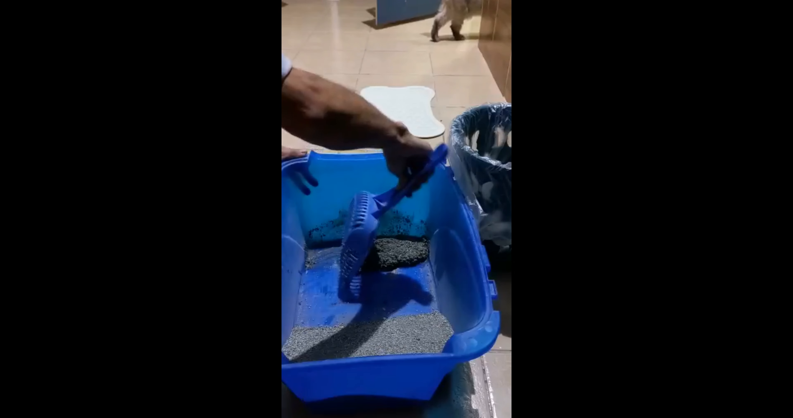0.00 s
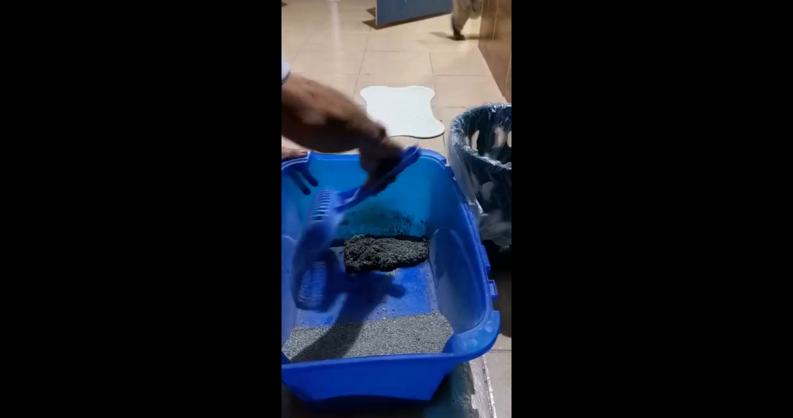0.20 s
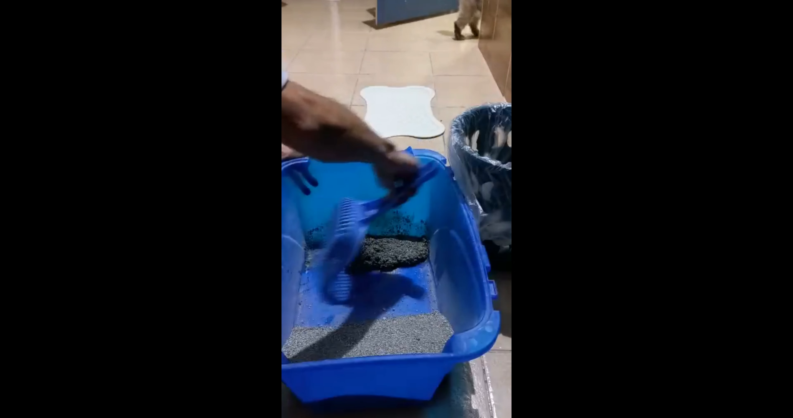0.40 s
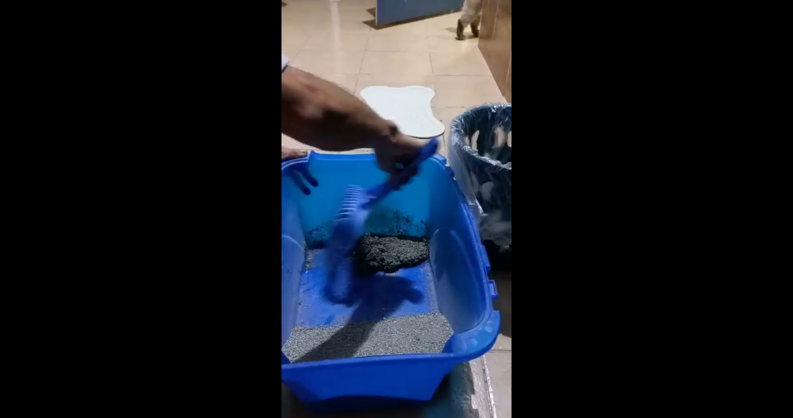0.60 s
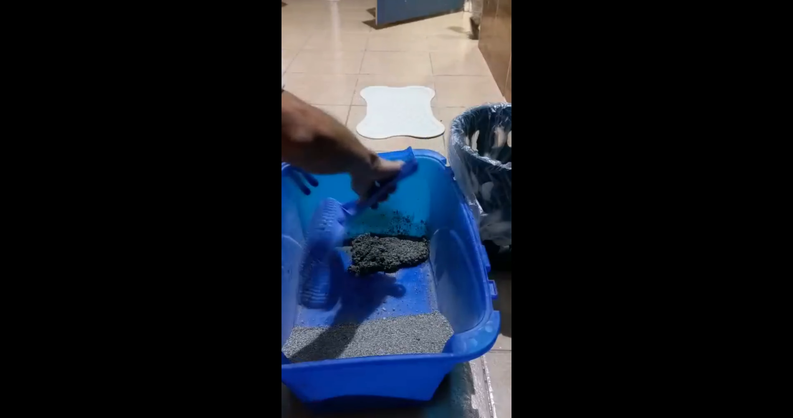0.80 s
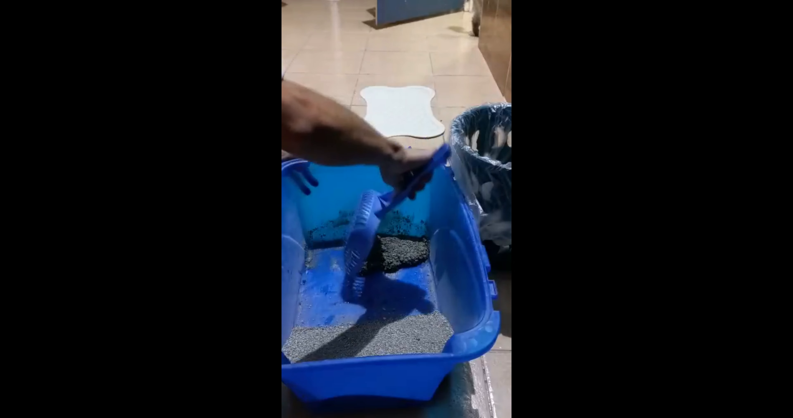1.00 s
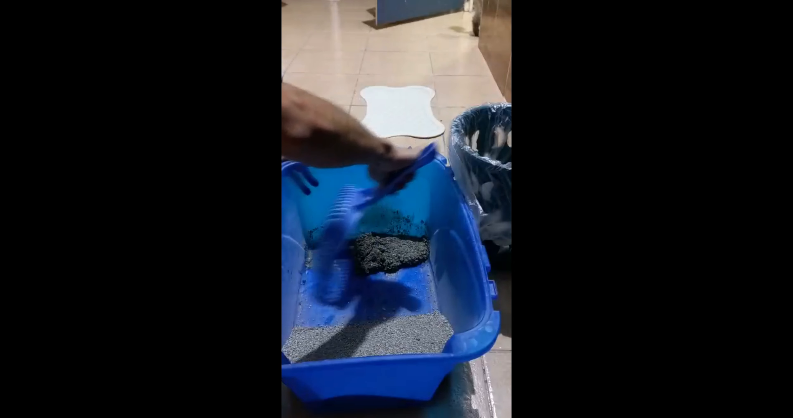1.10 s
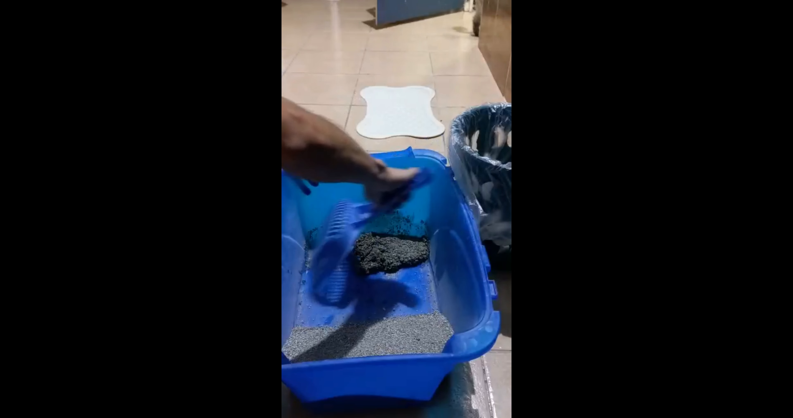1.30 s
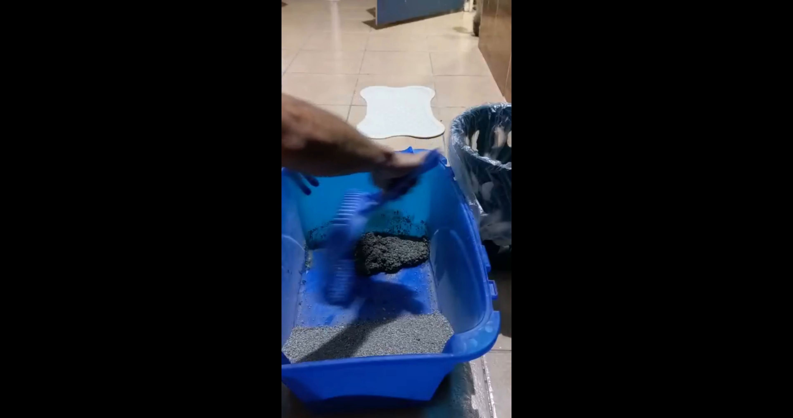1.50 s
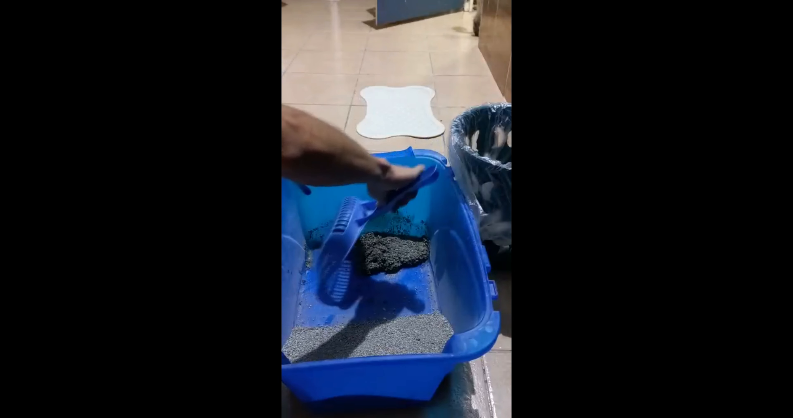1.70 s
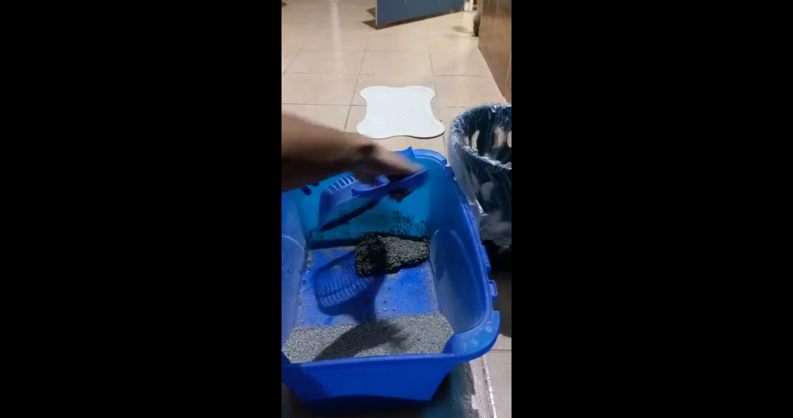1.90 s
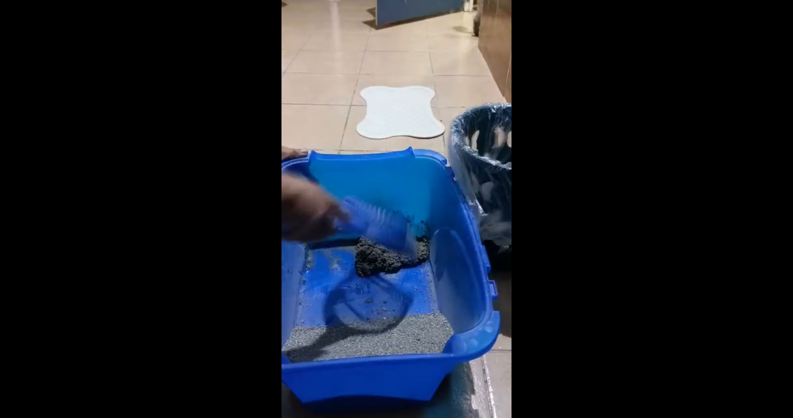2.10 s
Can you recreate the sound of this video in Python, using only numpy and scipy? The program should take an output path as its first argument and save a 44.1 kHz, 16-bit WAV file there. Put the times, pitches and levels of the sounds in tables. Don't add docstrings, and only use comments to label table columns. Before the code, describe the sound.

Quick gritty scrapes of a plastic scoop shaken in a litter box, with hollow plastic bumps

```python
import sys
import numpy as np
from scipy import signal
from scipy.fft import rfft, irfft
from scipy.io import wavfile

SR = 44100
rng = np.random.default_rng(int(sys.argv[2]) if len(sys.argv) > 2 else 0)


def voltage_ratio(decibels):
    exponent = np.asarray(decibels, float) / 20
    return 10 ** exponent


def materialize(psi):
    bounded = np.clip(np.atleast_2d(psi).T, -1, 1)
    quanta = np.round(bounded * 32767).astype(np.int16)
    wavfile.write(sys.argv[1], SR, quanta)


N = 97020
BODY_PAN_DB = 2.5


def rms_one(x):
    return x / np.sqrt(np.mean(x ** 2) + 1e-20)


def filtered(x, order, hz, kind="low"):
    return signal.sosfilt(signal.butter(order, hz, kind, fs=SR, output="sos"), x)


def coloured(x, spectrum):
    hz, db = np.transpose(spectrum)
    grid = np.fft.rfftfreq(x.shape[-1], 1 / SR) + 1
    octaves_outside = np.log2(np.clip(hz[0] / grid, 1, None) * np.clip(grid / hz[-1], 1, None))
    gain = voltage_ratio(np.interp(np.log(grid), np.log(hz), db) - 4.3 * octaves_outside)
    return rms_one(irfft(rfft(x) * gain, x.shape[-1]))


def pan(db):
    return voltage_ratio(np.array([[db / 2], [-db / 2]]))


def wander(db, step_s):
    marks = np.arange(0, N / SR + 0.5, step_s)
    return voltage_ratio(db * np.interp(np.arange(N) / SR, marks, rng.standard_normal(len(marks))))


def strokes(rows, fall_db_per_s):
    t, power = np.arange(N) / SR, np.zeros(N)
    for start, rise, hold, db in rows:
        up = np.clip((t - start) / max(rise, 0.0002), 0, 1) ** 0.82
        released_s = np.clip(t - start - rise - hold, 0, None)
        power += (up * voltage_ratio(db - fall_db_per_s * released_s)) ** 2
    return np.sqrt(power)


def contacts(rate, uneven_db, clump_db, apart):
    clump = wander(clump_db, 0.0053)
    struck = rng.random((3, N)) < rate / SR
    size = voltage_ratio(uneven_db * np.minimum(rng.exponential(1, (3, N)), 4))
    clicks = struck * size * rng.choice([-1, 1], (3, N))
    return rms_one(clump * (np.sqrt(1 - apart) * clicks[0] + np.sqrt(apart) * clicks[1:]))


def resonator(x, hz, r, gain):
    return signal.lfilter([gain, 0, -gain], [1, -2 * r * np.cos(2 * np.pi * hz / SR), r * r], x + 1e-18)


def body(x, peaks, turn=-1, patchy_db=3.0):
    out, power = 0, 0
    for k, (hz, width, db) in enumerate(peaks):
        r = np.exp(-np.pi * max(width, 5) / SR)
        gain = (1 - r * r) / 2
        out = out + turn ** k * voltage_ratio(db) * resonator(x * wander(patchy_db, 0.021), hz, r, gain)
        power += voltage_ratio(db) ** 2 * gain
    return out / np.sqrt(power)


def knocks(rows, swell_s):
    out, t = np.zeros(N + SR), np.arange(SR // 8) / SR
    swell = t / swell_s * np.exp(1 - t / swell_s)
    for start, db, hz in rows:
        i = int(start * SR)
        phase = rng.uniform(0, 2 * np.pi)
        out[i:i + len(t)] += voltage_ratio(db) * swell * np.sin(2 * np.pi * hz * t + phase)
    return out[:N]


def shared_noise(count):
    white, split_hz = rng.standard_normal((3, count)), 496
    return filtered(white[0], 2, split_hz) + filtered(white[1:], 2, split_hz, "high")


def air():
    # f/Hz, level/dB per Hz
    spectrum = [(40, -1), (78, 3), (150, -19), (350, -6), (950, -22), (3000, -30.5), (6500, -28.5),
                (16500, -50.5)]
    return voltage_ratio(-72.5) * coloured(shared_noise(N), spectrum)


def room(x):
    t60_s, gap_s = 0.29, 0.00314
    t = np.arange(SR // 2) / SR
    tail = shared_noise(len(t)) * voltage_ratio(-60 * t / t60_s) * (t > gap_s)
    dull = filtered(tail, 1, 5500)
    tail = dull + (tail - dull) * voltage_ratio(-150 * t)
    tail = filtered(tail, 2, 450, "high")
    tail = tail / np.sqrt(np.sum(tail ** 2) / 2)
    return voltage_ratio(-5) * signal.fftconvolve(x, tail, axes=1)[:, :N]


def squeaks():
    # start t/s, hold/s, level/dB, f/Hz
    squeak_rows = [
        (1.97, .07, -83, 930),
        (2.125, .08, -81, 1050),
    ]
    t, out = np.arange(N) / SR, 0
    for start, hold, db, hz in squeak_rows:
        unsteady = 0.012 * np.cumsum(rng.standard_normal(N))
        tone = np.sin(2 * np.pi * hz * t + unsteady)
        out = out + strokes([(start, 0.01, hold, db)], fall_db_per_s=600) * tone
    return out


def box():
    # start t/s, rise/s, hold/s, level/dB
    drags = [(-.03, 0.0069, 0.024, -54), (0.084, 0.012, 0.06, -66), (0.197, 0.0018, 0.051, -51.5),
             (0.232, 0.0051, 0.056, -52.5), (0.299, 0.0037, 0.058, -56.5), (0.413, 0.0042, 0.11, -55.5),
             (0.583, 0.032, 0.1, -55.5), (0.716, 0.013, 0.011, -55), (0.799, 0.0038, 0.061, -57),
             (0.893, 0.015, 0.096, -49.5), (1.054, 0.014, 0.055, -55), (1.114, 0.0051, 0.037, -53),
             (1.188, 0.0047, 0.038, -48), (1.247, 0.0098, 0.095, -53.5), (1.343, 0.0039, 0.048, -48.5),
             (1.377, 0.0043, 0.04, -48.5), (1.476, 0.005, 0.14, -56), (1.643, 0.0071, 0.039, -54.5),
             (1.711, 0.0062, 0.037, -50.5), (1.811, 0.0054, 0.053, -53.5)]
    # f/Hz, width/Hz, level/dB
    wall_modes = [(195, 32, -15.5), (252.3, 35, -1), (370, 61, 3), (508, 35, -0.5), (567, 68, -3),
                  (682, 126, -9)]
    # f/Hz, width/Hz, level/dB
    bottom_modes = [(78, 22, 0.046), (98, 3.9, 0)]
    # t/s, peak level/dB, f/Hz
    bumps = [(0.202, -44.5, 556), (0.241, -40.5, 555), (0.255, -45.5, 150), (0.256, -39.5, 386),
             (0.269, -42, 360), (0.278, -41.5, 347), (0.28, -45, 173), (0.316, -51.5, 415),
             (0.427, -43.5, 586), (0.441, -43.5, 378), (0.449, -44.5, 650), (0.463, -46.5, 536),
             (0.7, -52, 509), (0.729, -39, 366), (0.759, -47, 182), (0.8, -47.5, 312), (0.815, -51.5, 188),
             (0.823, -47.5, 362), (0.906, -44, 550), (0.918, -42.5, 610), (0.929, -43.5, 362),
             (0.932, -40.5, 529), (0.932, -52, 750), (0.95, -45, 660), (0.956, -43.5, 338),
             (0.967, -47, 516), (0.976, -60, 700), (0.983, -44, 372), (0.985, -55, 546), (1.009, -53, 392),
             (1.1, -47.5, 684), (1.118, -44.5, 540), (1.125, -44, 243), (1.135, -45, 387),
             (1.155, -47.5, 564), (1.22, -38.5, 382), (1.252, -51.5, 357), (1.309, -51, 536),
             (1.337, -40.5, 562), (1.337, -42.5, 740), (1.356, -39, 750), (1.367, -42, 722),
             (1.395, -39, 555), (1.406, -41, 252), (1.417, -43.5, 390), (1.664, -48, 527),
             (1.682, -49, 366), (1.698, -43.5, 510), (1.698, -45.5, 270), (1.74, -61, 352),
             (1.798, -47, 523), (1.812, -51, 506), (1.812, -46.5, 256), (1.825, -57, 286),
             (1.827, -43.5, 531), (1.839, -51, 516), (1.839, -52, 282), (1.861, -58, 524)]
    # t/s, peak level/dB, f/Hz
    further_bumps = [(.717, -40.5, 518), (.739, -46, 226), (.848, -49, 363), (1.205, -38.5, 528),
                     (1.495, -53, 250), (1.872, -57, 502)]
    # t/s, peak level/dB, f/Hz
    thumps = [(0.249, -48.5, 105.5), (0.28, -56.5, 101), (0.455, -61, 87), (0.73, -48, 107),
              (0.801, -54.5, 126), (0.911, -56, 106), (0.968, -54, 96), (1.001, -66, 97),
              (1.105, -62.5, 75), (1.207, -57, 102), (1.383, -49.5, 86), (1.714, -60, 76.4),
              (1.832, -51, 86)]
    judder = contacts(1800, uneven_db=1.0, clump_db=-2.0, apart=0.22)
    push = strokes(drags, fall_db_per_s=479) * judder
    walls = voltage_ratio(-1.0) * body(push, wall_modes, turn=0.95, patchy_db=0.5)
    bottom = voltage_ratio(-17) * body(push, bottom_modes, patchy_db=4.0)
    bump_s, thump_s = 0.0046, 0.011
    hits = knocks(bumps, bump_s) + knocks(further_bumps, bump_s) + knocks(thumps, thump_s)
    return pan(BODY_PAN_DB) * (walls + bottom + hits)


def scoop():
    # start t/s, rise/s, hold/s, level/dB
    scrapes = [(-.03, 0.0085, 0.017, -51.5), (.08, 0.007, 0.015, -65), (.2, 0.0012, 0.068, -61),
               (.395, 0.022, 0.033, -39), (.575, 0.0088, 0.055, -50.5), (.61, 0.034, 0.0098, -44),
               (.69, 0.011, 0.034, -56.5), (.86, 0.06, .01, -42), (.9, 0.0086, 0.06, -40),
               (1.07, 0.0057, 0.074, -45), (1.15, 0.0053, 0.0056, -56), (1.208, 0.0025, 0.0054, -57),
               (1.325, 0.0045, 0.058, -38.5), (1.48, 0.029, 0.011, -44.5), (1.66, 0.025, 0.051, -42.5),
               (1.8, 0.0025, 0.0091, -51)]
    # f/Hz, width/Hz, level/dB
    blade_modes = [(855, 130, -6), (915, 79, 2.5), (1273, 30, 0), (1503, 28, 6), (1656, 190, -6.5),
                   (2352, 104, -0.5), (1094, 610, 0)]
    # t/s, peak level/dB, f/Hz
    catches = [(0.414, -38, 1655), (0.42, -40, 1268), (0.431, -44, 920), (0.454, -36.5, 1298),
               (0.648, -40, 1518), (0.916, -51, 1263), (0.928, -39.5, 1560), (0.931, -40, 850),
               (0.941, -39, 1886), (0.958, -48, 920), (1.083, -46, 1304), (1.329, -39.5, 1865),
               (1.335, -47, 790), (1.34, -35.5, 1310), (1.361, -49, 820), (1.393, -44, 800),
               (1.395, -39.5, 1294), (1.501, -39.5, 1508), (1.51, -41, 1320), (1.518, -44, 1507),
               (1.7, -43, 1300), (1.722, -55, 1380)]
    # t/s, peak level/dB, f/Hz
    grazes = [(.1, -58.5, 1292), (.595, -47, 1308), (.665, -39.5, 2350), (1.672, -42.5, 1485),
              (1.808, -49, 1281), (1.815, -48.5, 950)]
    slips = contacts(1700, uneven_db=1.5, clump_db=-2.0, apart=0.75)
    slips = strokes(scrapes, fall_db_per_s=319) * slips
    ring = voltage_ratio(-1.5) * filtered(body(slips, blade_modes, patchy_db=2.0), 2, 2360)
    catch_s = 0.0061
    return pan(BODY_PAN_DB) * (ring + knocks(catches, catch_s) + knocks(grazes, catch_s))


def crunch(clicks):
    dealt, out = rng.integers(0, 24, N), 0
    for k, hz in enumerate(np.geomspace(1500, 7000, 24)):
        r = voltage_ratio(-60 * hz / (25 * SR))
        own_clicks = clicks * (dealt == k) * wander(1.46, 0.02)
        out = out + resonator(own_clicks, hz, r, gain=1) * np.sqrt(1 - r)
    return rms_one(out)


def grit():
    # start t/s, rise/s, hold/s, fine grains level/dB, coarse above fine/dB
    slides = [(-.03, 0.0096, 0.016, -76.5, 16), (0.08, 0.0082, 0.013, -81, -3),
              (0.195, 0.019, 0.047, -70, 14.5), (0.299, 0.0026, 0.013, -64, 12),
              (0.354, 0.077, 0.013, -48.5, 6), (0.572, 0.017, 0.033, -55.5, 4.5),
              (0.631, 0.02, 0.014, -55, 5.5), (0.651, 0.017, 0.041, -63, 13.5),
              (0.795, 0.014, 0.037, -61.5, 5.5), (0.842, 0.062, 0.05, -48, 5),
              (1.053, 0.043, 0.022, -55, 6.5), (1.141, 0.016, 0.0055, -52, 7.5),
              (1.204, 0.0017, 0.0063, -53, 6.5), (1.257, 0.079, 0.049, -48, 5),
              (1.478, 0.0014, 0.07, -47.5, 4), (1.622, 0.029, 0.08, -60, 7.5),
              (1.665, 0.003, 0.02, -55, 5.5), (1.688, 0.018, 0.016, -62.5, 15),
              (1.798, 0.0081, 0.027, -74, 9.5), (2.066, 0.035, 0.094, -89, -1.5)]
    # t/s, peak level/dB
    large_grains = [(.101, -66), (.2668, -50), (.3042, -47), (.3197, -49), (.5754, -55), (.794, -61),
                    (1.1621, -48), (1.2068, -49), (1.213, -42), (1.481, -46), (1.668, -36), (1.7035, -45)]
    # f/Hz, level/dB per Hz
    fine_spectrum = [(2500, -5.5), (5000, -14.5), (6800, 3.5), (8600, -2.5), (12000, -0.5), (16500, -5.5)]
    # f/Hz, level/dB per Hz
    coarse_spectrum = [(1200, -5.5), (2200, -4), (3300, 1), (4600, 0), (5600, -2), (8000, -19)]
    rows = np.array(slides, float)
    hiss = coloured(contacts(6100, uneven_db=0.5, clump_db=2.0, apart=1.0), fine_spectrum)
    fine = strokes(rows[:, :4], fall_db_per_s=357) * hiss
    rows[:, 3] += rows[:, 4]
    crunching = crunch(contacts(8300, uneven_db=0.0, clump_db=2.5, apart=0.93))
    coarse = strokes(rows[:, :4], fall_db_per_s=310) * coloured(crunching, coarse_spectrum)
    tick_rows = [(t - 0.0004, 0.0002, 0.0003, db - 3) for t, db in large_grains]
    click = coloured(rng.standard_normal(N), [(2500, -6), (5000, 0), (15000, -9)])
    ticks = strokes(tick_rows, fall_db_per_s=20000) * click
    return pan(-4.5) * fine + pan(0.5) * coarse + ticks


def scene():
    near = grit() + scoop() + box() + squeaks()
    near = near + room(near)
    left_lag_s = 0.00024
    lag = np.exp(-2j * np.pi * np.fft.rfftfreq(N, 1 / SR) * left_lag_s)
    near[0] = irfft(rfft(near[0]) * lag, N)
    hiss = voltage_ratio(-89) * rng.standard_normal(near.shape)
    return near + air() + hiss


def band_limit(x):
    return signal.sosfilt(signal.butter(12, 16010, fs=SR, output="sos"), x)


def record(dry):
    top_cut = signal.cheby2(22, 70, 16300, fs=SR, output="sos")
    mix = filtered(signal.sosfilt(top_cut, dry), 2, 45, "high")
    return band_limit(mix)


dry = scene()
out = record(dry)
materialize(out)
```